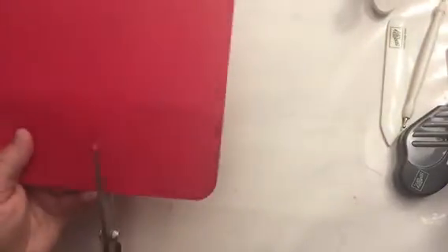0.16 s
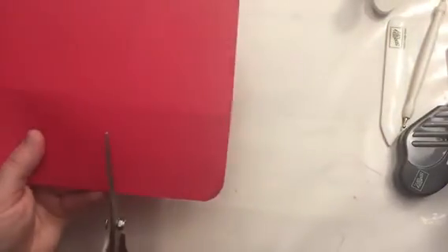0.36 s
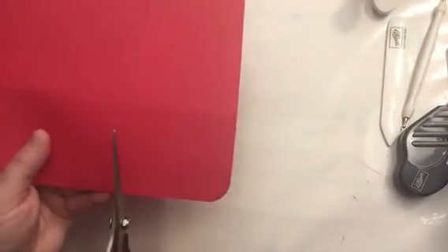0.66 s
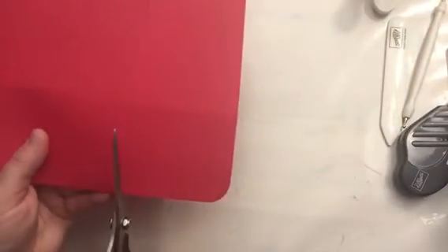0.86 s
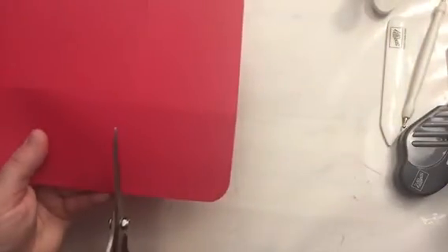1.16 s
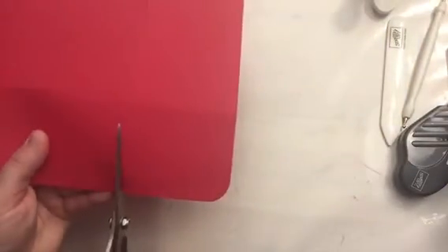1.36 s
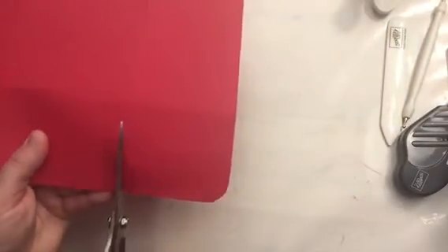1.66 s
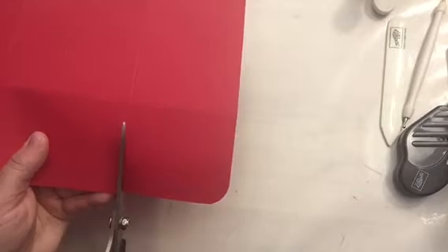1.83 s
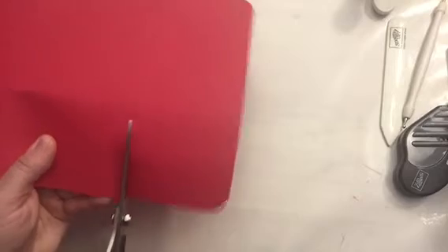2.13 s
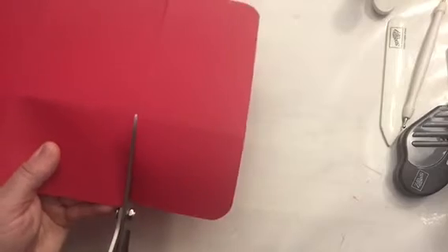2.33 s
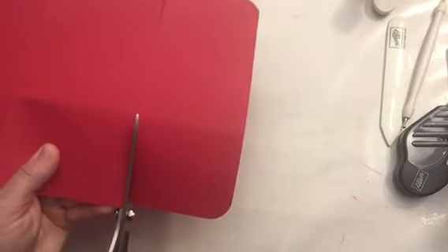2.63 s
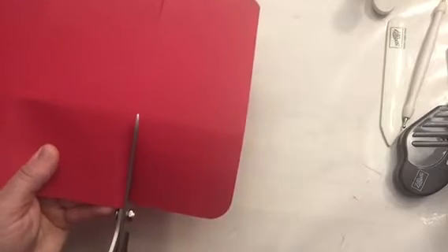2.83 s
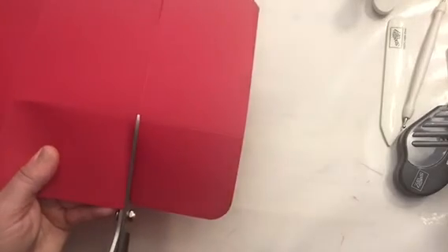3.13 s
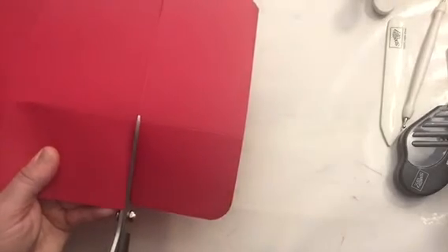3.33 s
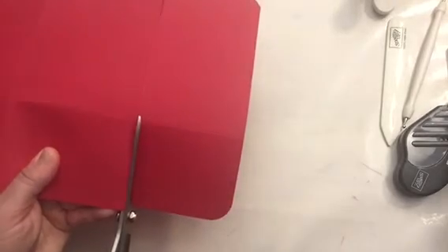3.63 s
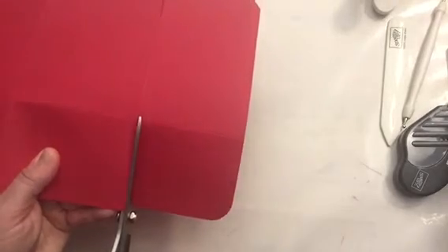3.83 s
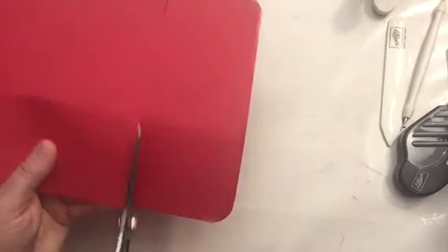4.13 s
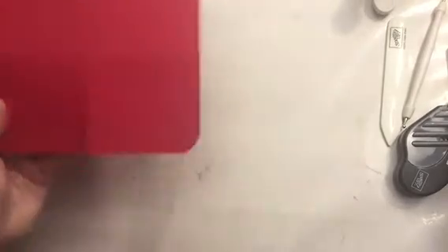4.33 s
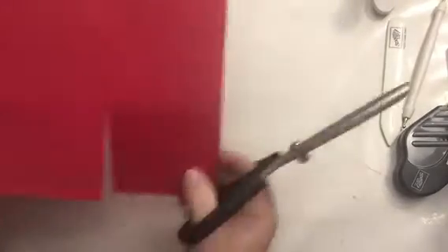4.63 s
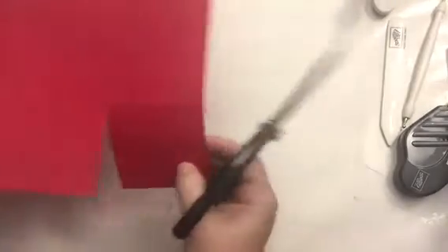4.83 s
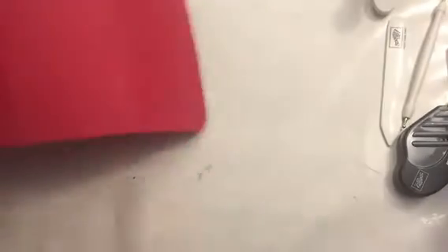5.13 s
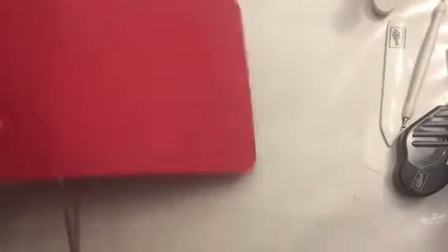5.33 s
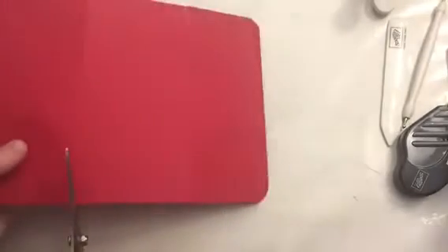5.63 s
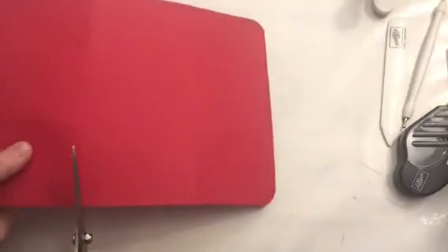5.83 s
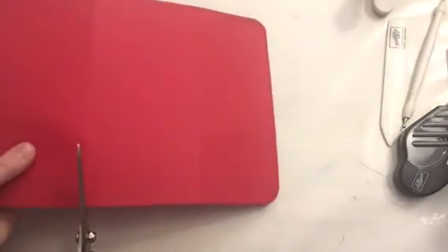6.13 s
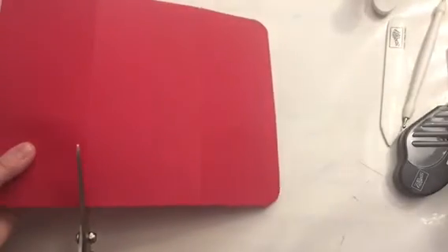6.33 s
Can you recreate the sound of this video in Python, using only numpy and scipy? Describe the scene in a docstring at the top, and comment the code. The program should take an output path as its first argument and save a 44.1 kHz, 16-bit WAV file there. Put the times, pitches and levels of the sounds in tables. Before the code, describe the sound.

Scissors slowly crunch through stiff card in one jerky, gritty cut, then the sheet is pulled off, turned and knocked on a table.

```python
"""Card rubs softly over faint room air, close to a small microphone in a quiet room; then scissors bite slowly
through the stiff card. The cut runs steadily and in jerks: bursts of snapping fibres, made of dense random
impulses, ring the card and the blades. Later the sheet is pulled off, turned, dragged and knocked on the table:
dense grit and short noises, sudden or slower, through the sheet's own resonances."""
import sys
import numpy as np
from scipy import signal
from scipy.io import wavfile
from scipy.ndimage import uniform_filter1d

SR = 44100
rng = np.random.default_rng(int(sys.argv[2]) if len(sys.argv) > 2 else 0)


def to_wav(s):
    """Save 16-bit WAV."""
    ch = np.atleast_2d(s).T  # columns
    pcm = np.round(np.clip(ch, -1, 1) * 32767)  # PCM
    wavfile.write(sys.argv[1], SR, pcm.astype(np.int16))


N = 285327
TIME = np.arange(N) / SR


def amp(db):
    """Amplitude factor of a level in dB."""
    return 10 ** (np.asarray(db) / 20)


def read(points, hz):
    """A spectrum table read on a log-frequency axis."""
    f, value = np.transpose(points)
    return np.interp(np.log(hz + 1), np.log(f + 1), value)


def band(lo_hz, hi_hz):
    """Gain of a broad band with soft skirts."""
    return lambda hz: 1 / np.sqrt((1 + (lo_hz / (hz + 1)) ** 6) * (1 + (hz / hi_hz) ** 6))


def modes(table):
    """Gain of a set of resonances, their powers added."""
    return lambda hz: np.sqrt(sum(amp(2 * db) / (1 + (2 * (hz - f) / w) ** 2) ** 2.2 for f, w, db in table))


def colour(x, gain):
    """Causal minimum-phase filter of energy 1, shaped by a gain given as a function of Hz."""
    log_gain = np.log(gain(abs(np.fft.fftfreq(4096, 1 / SR))) + 1e-4)
    taps = np.fft.ifft(np.exp(np.conj(signal.hilbert(log_gain)))).real[:2048]
    return signal.oaconvolve(x, taps / np.linalg.norm(taps))[:N]


def resonate(x, hz, width):
    """A steep resonance of energy 1 that follows the curve hz: shift down, smooth twice, shift back."""
    turn = np.exp(2j * np.pi * np.cumsum(hz * np.ones(len(x))) / SR)
    r = np.exp(-np.pi * width / SR)
    smooth = signal.lfilter([1], np.poly([r, r]), x / turn)
    return (turn * smooth).real * np.sqrt(2 * (1 - r * r) ** 3 / (1 + r * r))


def add(mix, s, sound):
    """Mixes rows of sound in at time s."""
    part = mix[:, round(s * SR):][:, :sound.shape[1]]
    part += sound[:, :part.shape[1]]


def control(tables, axis):
    """One column followed through all strokes."""
    rows = np.vstack(tables)
    return np.interp(TIME, rows[:, 0], rows[:, axis])


def steps(table):
    """Gains that hold each row until the next."""
    s, *db = np.transpose(table)
    return amp(np.array(db)[:, np.searchsorted(s, TIME, "right") - 1])


def strokes(tables, voices):
    """Gain curves, voices(columns) giving the dB of each layer; a stroke starts at once, trails off briefly."""
    out = np.zeros((len(voices(*tables[0][0][1:])), N))
    for rows in tables:
        s, *columns = np.transpose(rows)
        t = np.arange(s[0], s[-1] + 0.025, 1 / SR)
        edge = np.clip(np.minimum((t - s[0]) / 0.0014, (t[-1] - t) / 0.0028), 0, 1)
        levels = voices(*(np.interp(t, s, c) for c in columns))
        add(out, s[0], amp(levels) * edge)
    return out


def fibres(per_s, spread_db, clump_db):
    """Tiny snaps of uneven size that come in clumps of a few milliseconds; rms 1."""
    size = amp(spread_db * np.minimum(rng.exponential(1, N), 4)) * rng.standard_normal(N)
    clumps = uniform_filter1d(uniform_filter1d(rng.standard_normal(N), size=150), size=150)
    snaps = size * (rng.random(N) < per_s / SR) * amp(clump_db * clumps / clumps.std())
    return snaps / snaps.std()


def mottled(x, depth_db):
    """Random slow patches of louder and softer tone, each about 300 Hz by 70 ms."""
    z = signal.stft(x, nperseg=512, noverlap=384)[2]
    patches = rng.standard_normal(z.shape[::-1])
    for frames, bins in ((16, 3), (16, 2)):
        patches = uniform_filter1d(uniform_filter1d(patches, frames, axis=0), bins, axis=1)
    gain = amp(depth_db * patches.T / patches.std())
    return signal.istft(z * gain / np.sqrt(np.mean(gain ** 2)), nperseg=512, noverlap=384)[1][:N]


def background():
    """Room air and microphone hiss, and the table's rumble: coloured noise above and below 140 Hz."""
    # spectrum of the quiet room: f/Hz, density/dB per Hz (relative)
    air_spectrum = [(15, -59), (25, -21.5), (72, -6.5), (113, -13), (153, -9), (255, -16), (393, -20.5),
                    (426, -20), (475, -19.5), (751, -23), (908, -23), (1880, -26.5), (15900, -38.5)]
    # hands shake the table: t/s, level/dB, half length/s (one sigma of a bell curve)
    shakes = [(.8, -81, 0.34), (1.904, -69, 0.2), (2.643, -59, 0.077), (2.822, -65, 0.017),
              (3.108, -72, 0.087), (3.933, -74, 0.054), (4.286, -56, 0.053), (4.666, -55.5, 0.039),
              (5.058, -66.5, 0.15), (5.997, -75, .15), (6.47, -71, .06)]
    air_db, steady_rumble_db = -69.5, -75.5
    quiet = lambda lo_hz, hi_hz: lambda hz: amp(read(air_spectrum, hz)) * band(lo_hz, hi_hz)(hz)
    air = colour(rng.standard_normal(N), quiet(140, 20000))
    rumble = colour(rng.standard_normal(N), quiet(35, 140))
    shaking = sum(amp(db) * np.exp(-.5 * ((TIME - s) / half) ** 2) for s, db, half in shakes)
    return amp(air_db) * air + (amp(steady_rumble_db) + shaking) * rumble


def room(x):
    """Reflections off the walls: sparse taps of random sign, each band dying at its own speed."""
    # decay of the room: f/Hz, t60/s
    walls = [(200, 0.13), (1000, 0.17), (4000, 0.11), (12000, 0.065)]
    taps = np.zeros(SR // 2)
    at = np.arange(200, SR // 2 - 20, 20)
    taps[at + rng.integers(0, 20, len(at))] = rng.choice([-1., 1.], len(at))
    hz, t, z = signal.stft(taps, SR, nperseg=256)
    fading = z * amp(-60 * t / read(walls, hz)[:, None])
    tail = signal.istft(fading, SR, nperseg=256)[1]
    return signal.fftconvolve(x, tail / np.linalg.norm(tail))[:N]


def rub_voices(db, bright_db, treble_db):
    """Levels of scrape, boom, scratch and rasp for one moment of rubbing."""
    # scrape, then sheet boom: level over the pressure/dB, gain per dB of brightness/dB
    rub_mix = [(-3, 0.62), (-9, -0.3)]
    scrape_boom = (base + lean * bright_db for base, lean in rub_mix)
    return db + np.array([*scrape_boom, treble_db, bright_db])


def handling():
    """Rubbing is dense grit, a knock a short noise, sudden or slower; both sound through the same sheet."""
    # card rubbing on blades, fingers and table, one list a move:
    # t/s, pressure as level/dB, brightness/dB, high treble/dB over the pressure
    rubs = [
        [(0.0, -77, -4, -5), (0.018, -61.5, -6, -10), (0.218, -69, -5, -9), (0.308, -53, -5.5, -12),
         (0.366, -76, -1, -3), (0.388, -55.5, -6, -15), (0.468, -71.5, -4, -8), (0.56, -63.5, -6.5, -18),
         (0.66, -89, -11, -10)],
        [(2.14, -46, -15, -24), (2.158, -31.5, -14.5, -34), (2.24, -30.5, -1, -12), (2.284, -24, -7.5, -9.5),
         (2.322, -28, -8, -18), (2.368, -53, -7.5, -15), (2.394, -51, -4.5, -24), (2.406, -68, -2, -15),
         (2.45, -73, -3, -12)],
        [(4.15, -69, -13, -23), (4.196, -31, 1, -9), (4.232, -29, -1.5, -5.5), (4.254, -40.5, -3, -6),
         (4.278, -27.5, -9, -16), (4.29, -39.5, -3, -6), (4.3, -33.5, -13, -17), (4.326, -44, -11.5, -14),
         (4.33, -49, -3, -15)],
        [(4.64, -30, -15, -6.5), (4.67, -35, -11.5, -13.5), (4.7, -41.5, -5.5, -8), (4.708, -42, -6, -12),
         (4.722, -43, -7, -7.5), (4.768, -46, -2, 2), (4.87, -71, -3, 0.5)],
        [(4.87, -77, -9, -8), (4.878, -54.5, -1.5, -2), (4.924, -46, -5.5, -9), (4.95, -36.5, -2, -8),
         (4.968, -52, 5, 9), (4.99, -39.5, -12, -13), (5.03, -48.5, -3, -6.5), (5.08, -35, -5.5, -19),
         (5.097, -44.5, -16, -18)],
        [(5.11, -28, -17, -17), (5.114, -30, -13.5, -18), (5.154, -41.5, -12, -15), (5.158, -40.5, -15, -21),
         (5.182, -49, -12.5, -17), (5.204, -48, -6.5, -17), (5.226, -52, -7.5, -17), (5.294, -67.5, -5.5, -5),
         (5.33, -72, -9, -18)],
        [(5.33, -67.5, -7.5, -14), (5.392, -62, -3.5, -7), (5.418, -70, -3, -8), (5.426, -58, -7, -13),
         (5.436, -65, -27, -16), (5.458, -78, -8, -1), (5.502, -50, -6.5, -13), (5.538, -70, -8.5, -16),
         (5.66, -68, -6, -18)],
        [(5.695, -45, -6, -23), (5.699, -49, -8.5, -21), (5.831, -70, -6, -24), (5.899, -58.5, -7.5, -32),
         (5.937, -76, -2, -11.5), (5.985, -65.5, -1, -15), (6.037, -82, -10, -15), (6.061, -57.5, -5.5, -22),
         (6.15, -97, -12, 1)],
        [(0.77, -82, -5, -10), (0.798, -53, -6, -19), (0.822, -73, 1, -15), (0.842, -72, -6, -20),
         (0.86, -81, 2, -6)],
        [(2.1, -58, -12, -14), (2.114, -44, -10, -15), (2.126, -38, -12, -21), (2.14, -44.5, -15, -28)],
        [(3.8, -85, -11, -8), (3.826, -69, 0.5, -8), (3.954, -62.5, -11.5, -15), (3.966, -54, -2, -7),
         (4.06, -79.5, -2, -7)],
        [(4.337, -28, -12, -15), (4.341, -43, -11, -17), (4.443, -64, -8.5, -8), (4.571, -69.5, -8, -9),
         (4.6, -52.5, -8, -10)],
        [(4.607, -45, -13, -11), (4.625, -59, -7, -10), (4.628, -41.5, -10, -16)],
    ]
    # how the grip colours each move: from t/s, boom/dB, scrape/dB, deep flutter/dB
    hold = [(0, 1.9, -3, -5), (.7, -2, 3, -6), (2.0, 3.5, 4, -9), (2.14, -2.5, 0.3, -9.5),
            (2.27, -1, 1, -8), (3.7, -0.8, -3, -8), (4.1, 3.5, -2.3, -4), (4.335, .1, .1, -4),
            (4.6, 0, 1.5, -3.5), (4.87, -1, 2, -7.5), (4.975, 0.5, 0, -3.5), (5.1, 1.3, 3.5, -5),
            (5.33, 3.5, -1, -4), (5.69, 4, -16, -5)]
    # knocks, snaps and short swells of noise, sudden or slower:
    # t/s, level/dB, weight/dB, crispness/dB, ring f/Hz, base fade time/s
    knocks = [(.296, -49.5, -1.1, -21, 3620, 0.0059), (.755, -54.5, -7, -2.1, 3180, 0.0027),
              (.794, -49, 2.5, -6, 3350, 0.0058), (2.101, -44, -8, -2.1, 2060, 0.00082),
              (2.387, -42, 8, -18, 1480, 0.0017), (3.296, -44, -19, -3, 2720, 0.0055),
              (3.737, -43.5, -4, -9, 3830, 0.002), (3.964, -44.5, -7, -2, 2680, 0.00074),
              (3.973, -49, -21, -1, 2680, 0.0023), (4.274, -24.5, -9, -12, 1400, 0.0022),
              (4.2987, -28.5, -8, -8, 1960, 0.0014), (4.333, -25.5, -8.5, -4.5, 2260, 0.0017),
              (4.355, -31, -25, -14, 1760, 0.003), (4.3726, -34.5, -30, 2, 9400, 0.0014),
              (4.6052, -34, -5.5, -7, 1780, 0.003), (4.6318, -23, 0.5, 3, 2100, 0.00064),
              (4.636, -27, 1.5, 9, 2390, 0.0014), (4.705, -28, -6.5, -8, 1780, 0.0025),
              (4.894, -47, -6, 7, 2620, 0.0047), (4.971, -34, -5, 3, 2730, 0.0026),
              (4.983, -35.5, 5.5, -14, 2740, 0.0041), (5.0051, -42, 10.5, -14, 5600, 0.0038),
              (5.1052, -20.5, -4, 3.3, 2330, 0.0016), (5.115, -29.5, -17, -19, 1480, 0.0011),
              (5.126, -27, -8, -7.5, 1500, 0.0014), (5.157, -47.5, 13, -12, 1510, 0.0017),
              (5.2, -40, -13, -15, 3700, 0.00066), (5.229, -44.5, 6.5, -6, 2730, 0.0014),
              (5.426, -58, -2, -7, 2300, 0.0015), (5.641, -58, -6, -12, 1700, 0.0018),
              (5.6898, -45.5, 10.5, -11, 1590, .0014), (6.125, -62, -11, -3.5, 5740, .0016)]
    # overall colour of the sheet: f/Hz, density/dB per Hz (relative)
    sheet_colour = [(88, -76), (150, -20), (368, -4.5), (715, -3.5), (819, 1), (1560, -2), (1690, -4),
                    (2010, -3.5), (3210, -7.5), (4390, -10), (5030, -14.5), (5990, -11.5), (10400, -20.5),
                    (12800, -19.5), (15900, -23)]
    # its resonances: f/Hz, nominal width/Hz, relative level/dB
    sheet_peaks = [(1270, 74, -16), (2020, 96, -12), (3485, 230, -7), (3980, 360, -9), (4450, 180, -9.5),
                   (5450, 330, -11.5)]
    thud_db, thud_per_weight = -10, 0.36
    crack = 10.7  # gain of the first sample of body and crispness

    grit = fibres(per_s=20000, spread_db=-2.5, clump_db=1.66)
    scrape, boom, scratch, rasp = strokes(rubs, rub_voices) * grit

    blows, rings, t = np.zeros((4, N)), np.zeros((1, N)), np.arange(3000) / SR
    signs = rng.choice([-1., 1.], (len(knocks), len(t)))
    # rows of a knock: body, weight, crispness, thud
    for (s, db, weight_db, crisp_db, hz, fade), noise in zip(knocks, signs):
        u = t / (fade * np.array([[1], [2.2], [.9], [4.5]]))  # lower parts start and die more slowly
        share_db = np.array([0, weight_db, crisp_db, thud_db + thud_per_weight * weight_db])
        envelope = (0.14 + 0.55 * (1 - np.exp(-u * 5.6))) * np.exp(-u)
        blow = amp(db + share_db)[:, None] * envelope * noise
        blow[[0, 2], 0] *= crack
        add(blows, s, blow)
        add(rings, s, resonate(blow[0], hz, 980)[None])

    def sheet(lo_hz, hi_hz):
        """Gain of the sheet within a band."""
        peaks, limits = modes(sheet_peaks), band(lo_hz, hi_hz)
        return lambda hz: amp(read(sheet_colour, hz)) * (1 + 2.2 * peaks(hz)) * limits(hz)

    full, bare, deep = steps(hold)
    rubbed = colour(scrape * bare, sheet(2590, 2750))
    rubbed += colour(rasp, sheet(3080, 5880)) + colour(scratch, sheet(4430, 14300))
    rubbed += colour(boom * full, sheet(463, 1320)) + colour(boom * deep, sheet(230, 467))
    voiced = mottled(rubbed, depth_db=2.5) + 1.48 * rings[0]
    knocked = colour(0.97 * blows[0], sheet(1920, 5800)) + colour(blows[1], band(550, 1190))
    knocked += colour(blows[2], sheet(3640, 18000)) + colour(blows[3], band(167, 180))
    return knocked + voiced


def cut_voices(db, boom_db, place, tips):
    """Levels of bite, boom, crunch, hiss, fizz and flap for one bite."""
    # crunch, hiss, fizz, flap of the cut edge: level at a firm bite/dB, gain per dB of bite/dB,
    # gain at pitch position 1/dB, gain at full tip load/dB
    cut_mix = [(-58, 1.02, -8.5, 18.5), (-53.5, 0.78, -21, 8.5), (-67.5, 0.78, 0, -6),
               (-55, 2.14, 15.5, -0.5)]
    firm_db = -45
    rest = [base + follow * (db - firm_db) + lift * place + tip * tips
            for base, follow, lift, tip in cut_mix]
    return np.array([db, db + boom_db, *rest])


def cutting():
    """Fibres part steadily and in jerks; the resonances wander up and down during the cut."""
    # steady shearing, one list a stroke: t/s, bite level/dB, card boom/dB over the bite,
    # pitch position (0 low-boom end, 1 high-boom end), load on the blade tips (0-1)
    cuts = [
        [(1.19, -77, 1, 0.55, 0.65), (1.272, -64, 1, 0.23, 0.6), (1.41, -53.5, 0.5, 0.17, 0.23),
         (1.462, -67.5, -0.5, 0.29, 0.6), (1.654, -52.5, 1, 0.14, 0.17), (1.828, -49, -10.5, 0.36, 0),
         (1.93, -55.5, 0, 0.79, 0.07), (1.998, -63, 10.5, 0.93, 0.08), (2.05, -69.5, -1, 0.8, 0.5)],
        [(2.47, -71, 2, 0.4, 0.03), (2.532, -57, -6, 0.08, 0), (2.702, -61, 4.5, 0.42, 0.04),
         (2.802, -50, -3.5, 0.65, 0.04), (2.922, -50, -1, 0.99, 0.43), (2.946, -58, -15, 1, 0.62),
         (3.076, -61, -6, 1, 0.48), (3.16, -50, -4, 0.74, 0.5), (3.28, -66.5, -8, 0.85, 1)],
        [(3.33, -62, -24, 0.44, 0.8), (3.376, -54, -6, 0.5, 0.76), (3.442, -53, -2.5, 0.24, 0.67),
         (3.518, -74, -7, 0.38, 0.7), (3.546, -59, -1.5, 0.08, 0.58), (3.7, -76, -9, 0.63, .8)],
    ]
    # jerks of the cut: crest t/s, bite level/dB, boom/dB over the bite, nominal half length/s (one sigma)
    jerks = [(1.2197, -60.5, -8, 0.0024), (1.301, -58, 1, 0.0032), (1.349, -66, -11, .0026),
             (1.362, -59, 4, .0019), (1.4503, -60, 1.5, 0.01), (1.4685, -55, -3, 0.003),
             (1.484, -60.5, 14, 0.0015), (1.5125, -46.5, -2, 0.0047), (1.538, -56, -5, 0.0075),
             (1.558, -58, 6, 0.0024), (1.5814, -59, 4, 0.0027), (1.592, -61.5, 16, 0.0019),
             (1.638, -53, -13, 0.017), (1.6917, -57, -6, 0.003), (1.722, -58, 4, .0024),
             (1.745, -53.5, 3, .0063), (1.772, -52.5, -9, 0.0084), (1.814, -50, 8.5, 0.0061),
             (1.8533, -41, -5.5, 0.0039), (1.868, -45, -4.5, 0.0046), (1.8844, -45.5, -0.5, 0.0023),
             (1.902, -49, -6, 0.0039), (1.9353, -34.5, -16, .0032), (1.959, -36.5, -7.5, 0.0049),
             (1.983, -35.5, -15, 0.0071), (2.005, -34.5, -9, 0.0051), (2.4894, -45.5, -12, 0.004),
             (2.512, -45.5, -6, 0.0072), (2.5476, -45, -6, 0.011), (2.586, -41, -8.5, 0.0045),
             (2.6023, -40.5, -6, 0.0014), (2.619, -45, 1, 0.0037), (2.638, -48, -3, 0.0045),
             (2.669, -40, -2, 0.0041), (2.686, -50.5, 1.1, 0.0046), (2.7113, -43.5, -12, 0.0039),
             (2.74, -51, -13, .0057), (2.774, -46, -5, 0.0038), (2.7914, -44.5, 1.5, .0019),
             (2.836, -37, -7.5, 0.0035), (2.8683, -35.5, -10, 0.0034), (2.899, -40.5, 1.3, 0.0037),
             (2.9123, -36.5, -5, 0.0036), (2.944, -47, -11, 0.0029), (2.962, -50, -8, 0.0066),
             (2.9912, -45, -10, .0021), (3.0037, -39, -9, 0.0026), (3.0313, -43.5, -7.5, 0.0086),
             (3.0597, -43.5, -19, 0.003), (3.087, -42, -28, .0021), (3.106, -51.5, -11, 0.0056),
             (3.123, -39, -14, 0.00092), (3.139, -40, -7, 0.0052), (3.1583, -47.5, 1, 0.0063),
             (3.182, -33, -18, 0.00069), (3.2067, -36.5, -5, 0.0036), (3.2246, -45.5, -0.5, 0.0072),
             (3.2446, -40.5, -11, 0.002), (3.3734, -48, .1, 0.0073), (3.4, -54, -1, 0.0036),
             (3.4314, -42, -7, 0.0025), (3.4432, -43, -18, 0.00098), (3.4707, -47, -5.5, .0018),
             (3.5074, -51.5, -9, 0.0034), (3.524, -50, -7, 0.0097), (3.5434, -49, -7, .0012),
             (3.582, -57, -15, 0.0033), (3.6137, -54.5, -5, 0.0039), (3.638, -57, -8, 0.005),
             (3.662, -41.5, -6.5, .0017)]
    # what the cut rings with: f/Hz, nominal width/Hz, relative level/dB
    bite_modes, crunch_modes, hiss_modes = [(1920, 210, 0.5), (2226, 300, 0), (2481, 370, -3.5),
                                            (2770, 770, -10.5)], [(3475, 670, -2), (3890, 450, -7),
                                                          (4300, 320, -1.5), (5350, 1070, 8)], [(5820, 820, 0.69), (6220, 310, 0),
                                                                          (6745, 430, 0), (7250, 170, 1),
                                                                          (8260, 1600, 0), (8710, 230, 1),
                                                                          (9630, 1800, 0.15)]
    # the same groups once the cut has reached the blade tips: f/Hz, nominal width/Hz, relative level/dB
    tip_bite, tip_crunch, tip_hiss = [(1964, 270, -2), (2220, 260, -4), (2640, 430, -4)], [(3540, 320, -4), (3890, 330, -6.5),
                                                        (4210, 490, -1.5), (5060, 520, -8)], [(5860, 470, -9),
                                                                            (6500, 440, -11),
                                                                            (7290, 500, 2),
                                                                            (8500, 390, -2.5),
                                                                            (9550, 860, -7.5)]
    # how freely the cut edge flaps: from t/s, level/dB
    slack = [(0, -10, ), (2.3, 1), (3.0, -1), (3.3, 4.5)]
    tips_from = 3.3  # s
    # pitches at positions 0 and 1, Hz
    boom_hz, hiss_hz, fizz_hz, crunch_hz = (930, 1206), (6700, 7300), (10800, 15500), (4030, 3610)

    drive, t = strokes(cuts, cut_voices), np.arange(-1000, 2000) / SR
    place, load = control(cuts, axis=3), control(cuts, axis=4)
    for s, db, boom_db, half in jerks:
        swell = np.exp(-.5 * (t / (half * np.where(t < 0, 1.05, .9))) ** 2)  # falls faster than it rises
        at = round(s * SR)
        levels = cut_voices(db, boom_db, place[at], load[at])
        add(drive[:-1], s + t[0], amp(levels)[:-1, None] * swell)  # no flap in a jerk

    snaps = fibres(per_s=14000, spread_db=3.0, clump_db=1.0)
    crests = (np.transpose(jerks)[0] * SR).astype(int)
    snaps[crests] += 0.92 * rng.standard_normal(len(jerks))  # one thick bundle gives way at each crest
    bite, boom, crunch, hiss, fizz, flap = drive * snaps

    def pitch(ends, bend=1):
        """Pitch curve between the two ends."""
        return ends[0] + (ends[1] - ends[0]) * np.clip(place, 0, 1) ** bend

    card = resonate(boom, pitch(boom_hz), 505) + amp(-8.0) * colour(boom, band(670, 1160))
    card += colour(flap * steps(slack)[0], band(255, 480))
    late = TIME > tips_from
    blades = colour(bite * ~late, modes(bite_modes))
    blades += resonate(colour(hiss * ~late, modes(hiss_modes)), pitch(hiss_hz), 1700)
    blades += resonate(colour(crunch * ~late, modes(crunch_modes)), pitch(crunch_hz), 1180)
    tip_groups = ((bite, tip_bite), (crunch, tip_crunch), (hiss, tip_hiss))
    tips = sum(colour(x * late, modes(table)) for x, table in tip_groups)
    fizzing = resonate(fizz, pitch(fizz_hz, bend=0.49), 2700)  # moves most near position 0
    fizzing += amp(-19) * colour(fizz, band(15300, 23000)) + amp(-2) * colour(fizz, band(9200, 14500))
    return card + blades + tips + fizzing


def scene():
    """Near sounds with a little room, over the background."""
    near = mottled(cutting(), depth_db=3.5) + handling()
    return (near + amp(-16.5) * room(near) + background())[None]


def record(dry):
    """The microphone has a dip in the treble; then the band limit."""
    edge_hz = 15730
    notched = signal.lfilter(*signal.iirnotch(10500, 9, SR), dry)
    heard = dry + 0.36 * (notched - dry)  # a partial notch
    low_pass = signal.firwin(511, edge_hz, window=("kaiser", 9), fs=SR)
    return signal.oaconvolve(heard, low_pass[None], "same")


dry = scene()
out = record(dry)
to_wav(out)
```